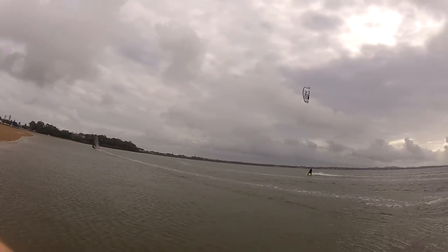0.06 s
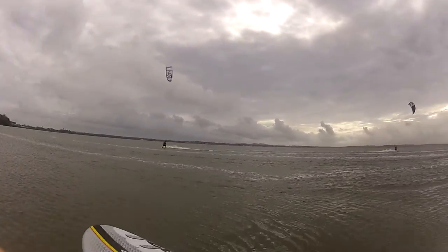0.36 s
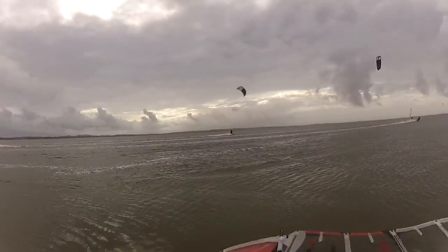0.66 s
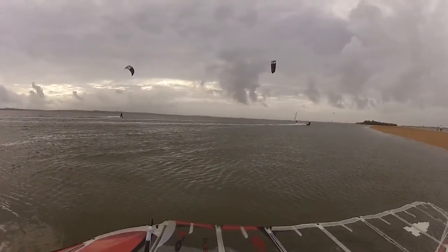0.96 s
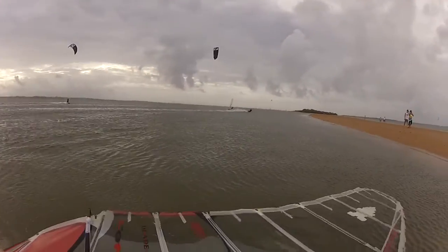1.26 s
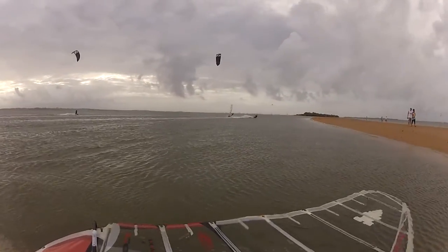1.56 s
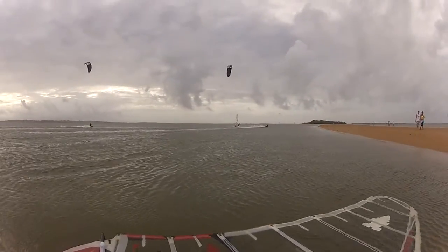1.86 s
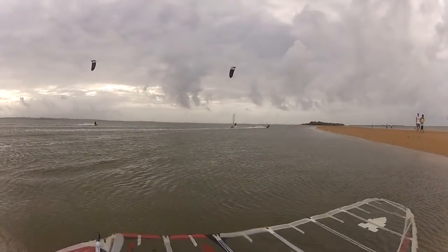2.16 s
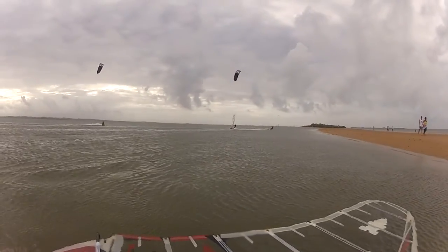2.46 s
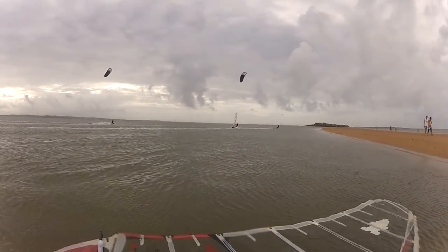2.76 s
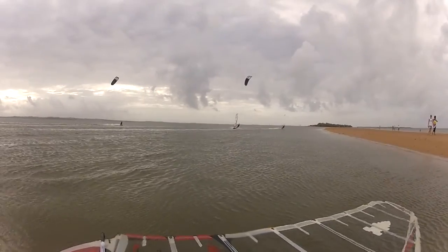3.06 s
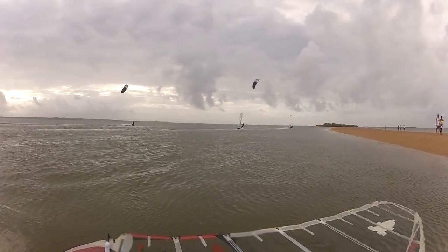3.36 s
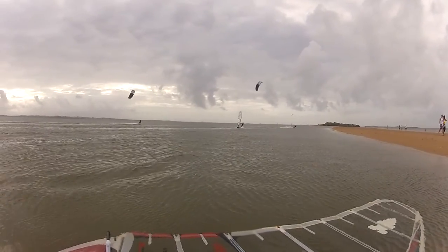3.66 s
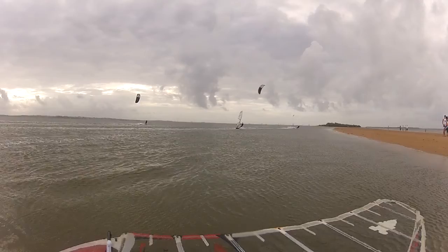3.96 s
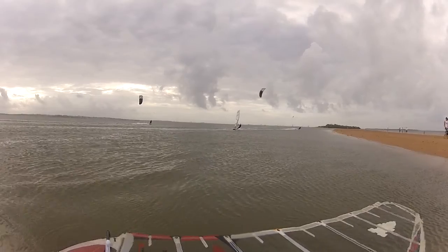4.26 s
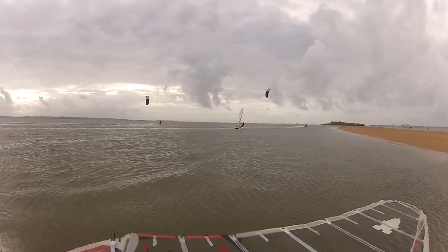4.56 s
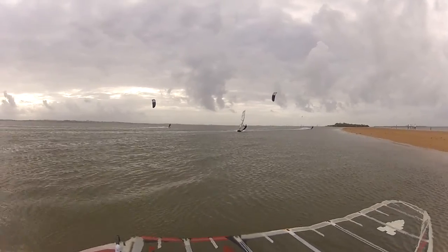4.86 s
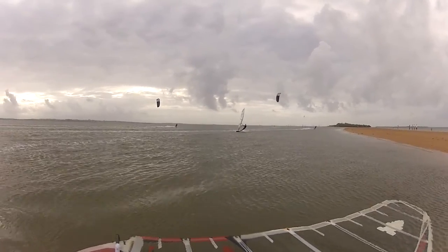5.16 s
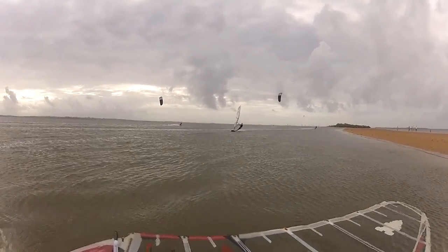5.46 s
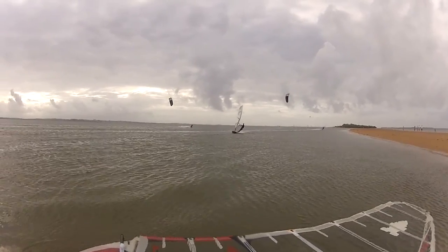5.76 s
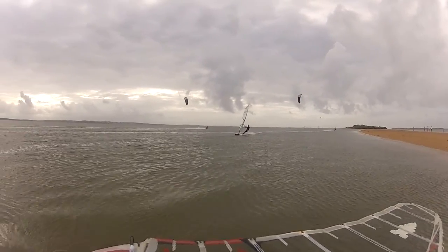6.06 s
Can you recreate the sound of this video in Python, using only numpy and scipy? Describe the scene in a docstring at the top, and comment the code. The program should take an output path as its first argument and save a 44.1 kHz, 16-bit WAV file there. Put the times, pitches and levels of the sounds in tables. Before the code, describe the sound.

Wind rumble and rushing water around a windsurf board, with early scrapes and knocks and a wavering high whine of air.

```python
"""Out on choppy water, a windsurf board planes along, heard from a small camera in a waterproof housing.
The bed is wind buffet, a low drone and the rumble and slap of the hull, under a grainy rush of water.
Air shedding vortices off thin edges whines above it, gliding with the speed of the board.
Early on, wet gear scrapes, squeals and knocks on the housing; later a sheet of spray washes by and
single drops tick on it. The camera's slow sampling gives everything a glassy top."""
import sys
import numpy as np
from scipy import signal
from scipy.fft import rfft, irfft, next_fast_len
from scipy.io import wavfile

SR = 44100
rng = np.random.default_rng(int(sys.argv[2]) if len(sys.argv) > 2 else 0)


def to_wav(sig):
    """Store sig (one row per channel, or 1-D mono) as 16-bit WAV at the path in sys.argv[1].

    Samples outside -1..1 are clipped; the rate is SR.
    """
    pcm = np.clip(np.atleast_2d(sig), -1, 1) * 32767
    pcm = np.round(pcm).astype(np.int16)
    wavfile.write(sys.argv[1], SR, pcm.T)  # frames by channels


N = 279153
T = np.arange(N) / SR

# airspeed, given as the pitch of its whine; it drives air, hull and water: t/s, f/Hz
AIRSPEED_PITCH = [(0, 2170), (.2, 2420), (1.25, 2740), (1.66, 2820), (2.02, 2670), (2.24, 2910),
                  (2.56, 2660), (2.9, 2570), (3.2, 2510), (3.42, 2570), (3.54, 2810), (3.92, 2910),
                  (4.35, 2710), (4.7, 2530), (5.02, 2440), (5.5, 2580), (5.98, 2600), (6.3, 2230)]
# brief lulls and puffs in the airflow: t/s, half length/s, pitch change/Hz
AIR_PUFFS = [(3.02, .07, -260), (4.555, .022, -260), (4.78, .04, -270), (5.12, .025, 110),
             (5.375, .02, 260), (5.85, .02, 130), (6.085, .05, -230)]
# gusts shaking housing and hull: t/s, rise/s, fall/s, eddy level/dB, hull level/dB
WIND_GUSTS = [(.3, .04, 0.057, -40, -36), (.45, .06, .06, -34.5, -37), (.8, .02, .1, -33, -31.5),
              (.91, .025, .025, -46, -30), (1.38, .18, .12, -40.5, -38.5), (1.62, .05, 0.036, -38, -47),
              (4.85, .25, .3, -47, -45)]
# tone colour of the eddies at the housing: f/Hz, relative level/dB
EDDY_SPECTRUM = [(15, -12), (35, -4), (75, 2), (105, -1), (140, -6), (400, -53)]
# tone colour of the hull rumble: f/Hz, relative level/dB
HULL_SPECTRUM = [(70, -12.5), (110, -4.5), (150, 1.5), (180, -0.5), (212, 2), (255, -9.5), (340, -15),
                 (430, -18), (700, -22), (1500, -47.5)]
# glide of the low drone: t/s, f/Hz
DRONE_PITCH = [(0, 305), (.85, 335), (1.9, 340), (2.7, 305), (3.0, 265), (3.95, 335), (4.4, 325),
               (5.1, 280), (5.9, 345), (6.33, 325)]
# chop slapping the hull: t/s, peak level/dB, f/Hz, bandwidth/Hz
HULL_SLAPS = [(.405, -26.5, 80, 70), (.447, -24.5, 94, 80), (.826, -27, 75, 70), (.852, -27, 85, 60),
              (.888, -17, 118, 60.4), (1.6, -24, 105, 60.3), (1.835, -30.5, 206, 24), (2.172, -32, 198, 26),
              (2.276, -32, 200, 26), (2.808, -31, 190, 35.7), (3.945, -32.5, 160, 26), (5.36, -34, 202, 22),
              (5.79, -34.5, 213, 22)]
# drops landing on the housing: t/s, relative level/dB
DROP_HITS = [(0.4948, -27), (.6275, -36), (1.1638, -42), (1.4346, -41), (1.953, -34.5), (1.9714, -39),
             (2.0293, -44), (2.4647, -43), (2.9766, -48), (3.909, -41), (3.919, -41), (4.8076, -41),
             (4.816, -33.5)]
# tone colour of the rushing water: f/Hz, relative level/dB
RUSH_SPECTRUM = [(200, -4), (450, -4), (620, -2), (800, -5), (1100, -2.5), (1350, -7.5), (1650, -5.5),
                 (1920, 3.5), (2100, 2), (2400, 4.5), (2850, -10), (3150, -20.5), (3650, -19),
                 (4100, -36.5)]
# EQ on the spray hiss: f/Hz, gain/dB
SPRAY_EQ = [(2600, -21), (3200, 5.5), (3700, 12), (4100, 0.5), (4500, 0.5), (4900, 0.5), (5350, -1),
            (5700, -23), (6000, -27)]
# sheets of water washing past: t/s, rise/s, fall/s, level/dB
WATER_SHEETS = [(.3, .3, .15, -44.5), (.835, .02, .025, -34.5), (.9, 0.033, .3, -48), (1.38, .17, .16, -35)]
# flares of the whine: t/s, level before the low-pass/dB, f/Hz
WHINE_FLARES = [(.014, -33.5, 2175), (2.9582, -29.5, 2540), (4.7545, -30.5, 2294), (4.953, -31, 2453),
                (4.987, -30, 2430), (6.066, -35, 2205)]
# gear sliding on the housing: start/s, end/s, scrape level/dB, squeal level before its trim/dB
GEAR_STROKES = [(.298, 0.329, -34, -36), (.366, 0.415, -26, -30), (0.413, .446, -31.5, -32.5),
                (.449, 0.463, -37, -48), (.47, .524, -38.5, -35), (.518, .57, -31.5, -36),
                (.562, .599, -22.5, -27), (.595, .642, -47, -44)]
# resonances that the sliding excites: f/Hz, bandwidth/Hz, gain/dB
SCRAPE_BANDS = [(1840, 310, 0), (2315, 300, 4), (2610, 325, 8.5), (2837, 146, 8.5), (3580, 400, -5),
                (3840, 180, -11), (4070, 170, -37), (5100, 260, -37)]
# ringing modes of the housing: f/Hz, relative level/dB, t60/s
HOUSING_MODES = [(605, -1, 0.015), (1130, 0, 0.024), (1310, -3.5, 0.0064), (1890, -3, .012),
                 (3600, -24, 0.014)]
# gear hitting the housing: t/s, crack level before the low-pass/dB, f/Hz, ring against crack/dB
GEAR_KNOCKS = [(0.303, -24, 2680, -28), (0.3076, -10.5, 2580, -20), (0.3157, -17.5, 1920, -18),
               (.419, -16.5, 2200, -17), (0.429, -17, 2280, -29), (.4828, -17, 2470, -37),
               (.6, -20, 2750, -14), (.601, -27, 3500, -27), (0.6092, -24.5, 1740, -26),
               (.6255, -27, 3300, -25), (0.6273, -9, 1970, -20), (0.6379, -16.5, 1930, -9),
               (0.662, -38, 2150, -20), (0.709, -43, 2100, -16), (0.767, -21, 2020, -5),
               (0.7746, -7, 2130, -13), (0.7756, -16, 2560, -20), (0.7783, -19, 2160, -30),
               (0.7843, -32, 1680, 6.5), (0.8222, -25.5, 2000, -9), (.842, -31, 2290, -3),
               (.911, -34.5, 1900, 0.5), (1.752, -24.5, 2050, -10)]

CRUISE_HZ = 2600  # pitch of the whine at cruising speed
# ducks in the mix: depth/dB, (start/s, end/s, fade out/s, fade in/s)
TURN_DUCK_DB, TURN_DUCK = 26, (.06, 1.45, .16, .8)  # the whine dies away as the camera swings round
RUMBLE_DUCK_DB, RUMBLE_DUCK = 10, (.54, .79, .05, .02)
WATER_DUCK_DB, WATER_DUCK = 13, (.645, .807, .035, .04)


def from_db(db):
    """Decibels to gain."""
    return 10 ** (np.asarray(db) / 20)


def rms_one(x):
    """Scale to unit rms."""
    return x / np.sqrt(np.mean(x ** 2) + 1e-20)


def glide(points):
    """A pitch curve at every sample."""
    return np.interp(T, *np.transpose(points))


def drift(rate_hz):
    """Smooth random modulation; rms about 1."""
    step, settle = 8, 4000
    pole = np.exp(-2 * np.pi * step * rate_hz / SR)
    noise = rng.standard_normal(N // step + settle + 2)
    slow = signal.lfilter([1], [1, -2 * pole, pole * pole], noise)[settle:]
    return np.interp(np.arange(N) / step, np.arange(len(slow)), rms_one(slow))


def gate(start, end, attack_s, release_s):
    """Attack, hold and release between two times; 0 to 1."""
    return np.clip(np.minimum((T - start) / attack_s, (end - T) / release_s), 0, 1)


def swell(s, rise_s, fall_s):
    """A rounded rise and fall around a moment; peak 1."""
    return np.exp(-((T - s) / np.where(T < s, rise_s, fall_s)) ** 2)


def with_surges(bed_db, surges):
    """Gain of a bed with passing surges added in power."""
    surge_power = sum((from_db(db) * swell(s, rise, fall)) ** 2 for s, rise, fall, db in surges)
    return np.sqrt(from_db(bed_db) ** 2 + surge_power)


def coloured(x, spectrum):
    """Shape a steady sound with an EQ curve; rms 1."""
    size = next_fast_len(N)
    hz, db = np.transpose(spectrum)
    bin_hz = np.maximum(np.arange(size // 2 + 1) * SR / size, 1)
    gain = from_db(np.interp(np.log(bin_hz), np.log(hz), db))
    return rms_one(irfft(rfft(x, size) * gain, size)[:N])


def band(x, hz, width_hz, order=2):
    """A resonance with steep skirts."""
    edges = [max(hz - width_hz / 2, 20), hz + width_hz / 2]
    return signal.sosfilt(signal.butter(order, edges, "band", fs=SR, output="sos"), x + 1e-18)


def lowpass(x, hz, order=6):
    """Roll off the top."""
    return signal.sosfilt(signal.butter(order, hz, fs=SR, output="sos"), x + 1e-18)


def grains(per_s, spread_db):
    """Random tiny impacts of uneven size; rms 1."""
    sizes = from_db(spread_db * np.minimum(rng.exponential(1, N), 4)) * rng.choice([-1, 1], N)
    return rms_one(sizes * (rng.random(N) < per_s / SR))


def ping(hz, width_hz, order=2, size=4000):
    """One brief contact ringing around a pitch; peak 1."""
    ring = band(signal.unit_impulse(size), hz, width_hz, order=order)
    return ring / np.abs(ring).max()


def shedding(hz, width_hz, order=3):
    """Vortices shed unevenly: a narrow, beating band of noise around a moving pitch; rms 1."""
    phase = 2 * np.pi * np.cumsum(hz) / SR
    eddies = lowpass(rng.standard_normal((2, N)), width_hz / 2, order=order)
    return rms_one(eddies[0] * np.cos(phase) + eddies[1] * np.sin(phase))


def add(out, s, sound):
    """Mix a sound in at a time."""
    at = max(round(s * SR), 0)
    out[at:at + len(sound)] += sound[:N - at]


def wind_and_hull(speed_db, eddy_db=-46, hull_db=-40.6, speed_power=1.1):
    """Eddies buffet the housing; the hollow hull rumbles over the chop, louder with speed."""
    eddy_gusts = [(s, rise, fall, db) for s, rise, fall, db, _ in WIND_GUSTS]
    hull_gusts = [(s, rise, fall, db) for s, rise, fall, _, db in WIND_GUSTS]
    duck_db = RUMBLE_DUCK_DB * gate(*RUMBLE_DUCK)
    buffet = with_surges(eddy_db + .7 * drift(3), eddy_gusts)
    shake = with_surges(hull_db + speed_power * speed_db - duck_db, hull_gusts)
    eddies = buffet * coloured(rng.standard_normal(N), EDDY_SPECTRUM)
    rumble = shake * from_db(drift(10)) * coloured(rng.standard_normal(N), HULL_SPECTRUM)
    return eddies + rumble


def drone(level_db=-49.3, ref_hz=320, pitch_power=3):
    """A thicker part sheds vortices about three octaves below the whine, louder as it rises."""
    hz = glide(DRONE_PITCH)
    gain = (hz / ref_hz) ** pitch_power * from_db(level_db - RUMBLE_DUCK_DB * gate(*RUMBLE_DUCK))
    return gain * shedding(hz, width_hz=95, order=5)


def slaps():
    """Wavelets thump the hollow hull, which booms for a few cycles."""
    out = np.zeros(N)
    for s, db, hz, width_hz in HULL_SLAPS:
        add(out, s, from_db(db) * ping(hz, width_hz, size=8000))
    return lowpass(out, hz=450, order=3)


def drops(trim_db=-6.5):
    """Single drops tick on the housing."""
    out = np.zeros(N)
    for s, db in DROP_HITS:
        add(out, s, from_db(db + trim_db) * ping(hz=4880, width_hz=700))
    return out


def water(speed_db, rush_db=-47.5, mist_db=-70.6, mist_rise_db_per_s=1.2, spray_send_db=-33):
    """Thousands of drops and bursting bubbles, dulled by the housing, under a thin hiss of spray."""
    duck = from_db(-WATER_DUCK_DB * gate(*WATER_DUCK))
    flow = with_surges(rush_db + 2.5 * speed_db, WATER_SHEETS)
    mist = from_db(mist_db + 1.8 * speed_db + mist_rise_db_per_s * T)
    rush = coloured(grains(per_s=7000, spread_db=2.5), RUSH_SPECTRUM)
    churn = from_db(drift(32))
    droplets = band(grains(per_s=5000, spread_db=4), hz=4640, width_hz=2330)
    spray = coloured(droplets, SPRAY_EQ) * np.hypot(mist, from_db(spray_send_db) * flow)
    return duck * flow * churn * rush + spray


def whine(hz, puff_hz, main_db=-43.8, skirt_db=-5.5, upper_db=-55, upper_hz=2780):
    """Air whistles past thin edges, fluttering with each eddy; a higher whistle comes and goes."""
    overspeed_hz = hz - CRUISE_HZ
    thinning_db = .018 * np.maximum(overspeed_hz, 0)
    main_gain = from_db(main_db - thinning_db + .8 * drift(11.5))
    upper_gain = from_db(upper_db - thinning_db / 2 + 2 * drift(1.9))
    flutter = (1 + .014 * drift(35)) * (1 + .017 * drift(12))
    core = shedding(hz * flutter, width_hz=115, order=2)
    skirt = from_db(skirt_db) * shedding(hz, width_hz=540)
    upper = shedding((upper_hz + .55 * overspeed_hz) * flutter, width_hz=140)
    whistles = main_gain * rms_one(core + skirt) + upper_gain * upper
    # the whine ducks in the turn, and swells when a lull pulls its pitch down
    fader_db = -TURN_DUCK_DB * gate(*TURN_DUCK) - .006 * puff_hz
    return from_db(fader_db) * lowpass(whistles, hz=3000, order=16)  # through the housing wall


def flares(length_s=.0084):
    """For a few milliseconds the shedding falls into step and the whine swells."""
    out, t = np.zeros(N), T[T < length_s]
    envelope = np.sqrt(np.sin(np.pi * t / length_s))
    for s, db, hz in WHINE_FLARES:
        add(out, s, from_db(db) * envelope * np.sin(2 * np.pi * hz * t))
    return lowpass(out, hz=2470)


def rubbing(slips_per_s=520, touch_db=-46, fizz_db=-31.5, squeal_hz=1106, bend_hz=36, squeal_trim_db=-2):
    """Wet gear sticks and slips: the wall rattles, grit fizzes, a mode squeals, sharper under pressure."""
    fades_s = .0078, .0086
    # a light touch lasts between the strokes
    pressure = from_db(touch_db) * gate(GEAR_STROKES[0][0], GEAR_STROKES[-1][1], *fades_s)
    singing = np.zeros(N)
    for start, end, scrape_db, squeal_db in GEAR_STROKES:
        contact = gate(start, end, *fades_s)
        pressure += from_db(scrape_db) * contact
        singing += from_db(squeal_db) * contact
    slip_rate = slips_per_s * from_db(4 * drift(150))
    slips = np.diff(np.floor(np.cumsum(slip_rate) / SR), prepend=0)
    jolts = rms_one(slips * from_db(.86 * rng.standard_normal(N)))
    force = jolts + rng.standard_normal(N)  # equal parts slip and grit
    scrape = rms_one(sum(from_db(db) * band(force, hz, width, order=3) for hz, width, db in SCRAPE_BANDS))
    fizz = from_db(fizz_db) * rms_one(band(force, hz=4500, width_hz=1900, order=3))
    pitch_hz = (squeal_hz + bend_hz * pressure / pressure.max()) * (1 + .005 * drift(56))
    squeal = rms_one(np.sin(2 * np.pi * np.cumsum(pitch_hz) / SR))
    shiver_db = 3 * drift(79)
    return pressure * (scrape + fizz) + singing * from_db(squeal_trim_db + shiver_db) * squeal


def knocks(wall_hz=3500):
    """Hard contacts crack briefly and leave the housing ringing."""
    out, t = np.zeros(N), T[:4000]
    ring = sum(from_db(db - 60 * t / t60) * np.sin(2 * np.pi * hz * t) for hz, db, t60 in HOUSING_MODES)
    for s, db, hz, ring_db in GEAR_KNOCKS:
        crack = ping(hz, width_hz=680, order=3)
        add(out, s, from_db(db) * (crack + from_db(ring_db) * ring))
    return lowpass(out, wall_hz)


def scene():
    """One speed drives hull, whine and water; all layers meet in mono at the enclosed microphone."""
    puff_hz = sum(change * swell(s, half_s, half_s) for s, half_s, change in AIR_PUFFS)
    whine_hz = glide(AIRSPEED_PITCH) + puff_hz
    speed_db = 20 * np.log10(whine_hz / CRUISE_HZ)
    bed = wind_and_hull(speed_db) + drone() + slaps()
    air = whine(whine_hz, puff_hz) + flares()
    return (bed + air + drops() + water(speed_db) + rubbing() + knocks())[None]


def record(dry, ceiling=1.1, hold_rate_hz=12000, cutoff_hz=15250):
    """Peaks soft-clip; the camera's slow sample-and-hold mirrors the sound into a glassy treble."""
    rounded = ceiling * np.tanh(dry / ceiling)
    slow = signal.resample_poly(rounded, hold_rate_hz, SR, axis=-1, window=("kaiser", 3))
    steps = np.repeat(slow, 4, axis=-1)
    glassy = signal.resample_poly(steps, SR, 4 * hold_rate_hz, axis=-1)[:, :N]
    return signal.sosfilt(signal.ellip(10, .2, 70, cutoff_hz, fs=SR, output="sos"), glassy)


dry = scene()
out = record(dry)
to_wav(out)
```